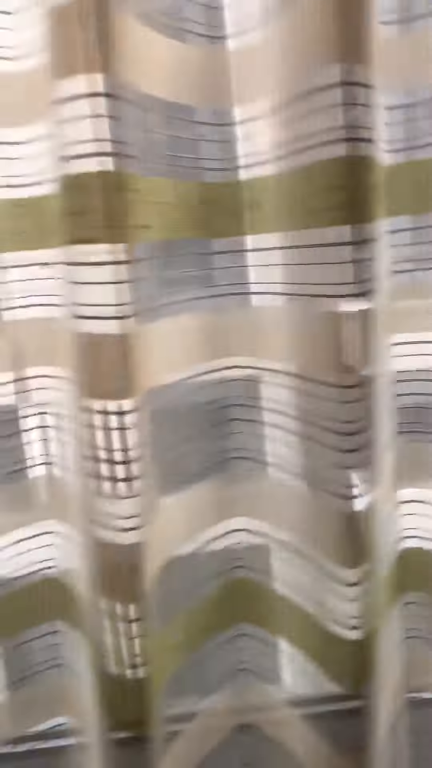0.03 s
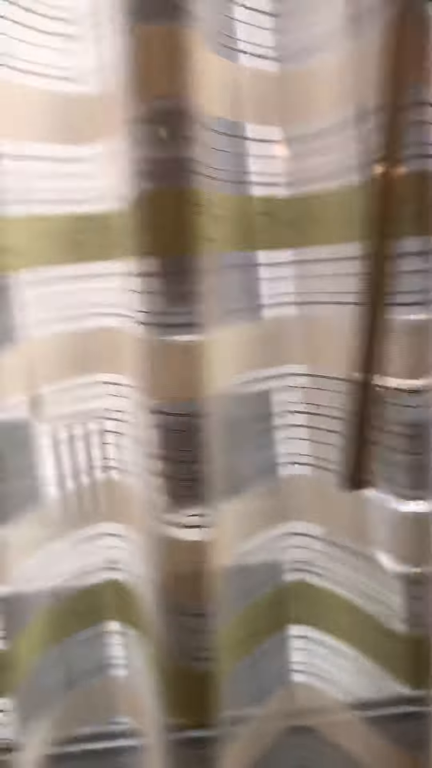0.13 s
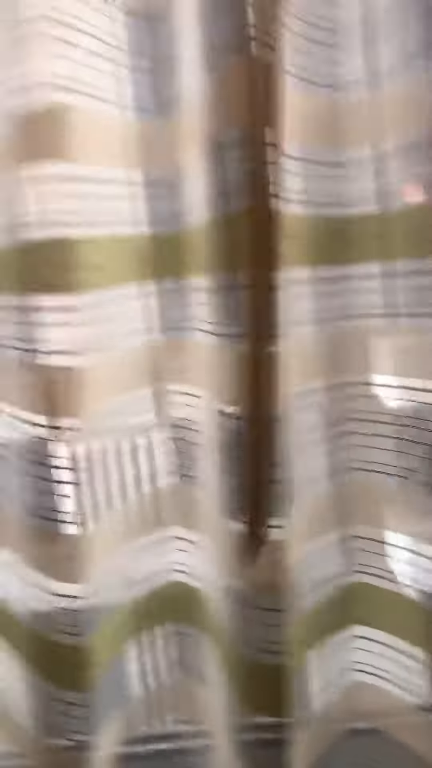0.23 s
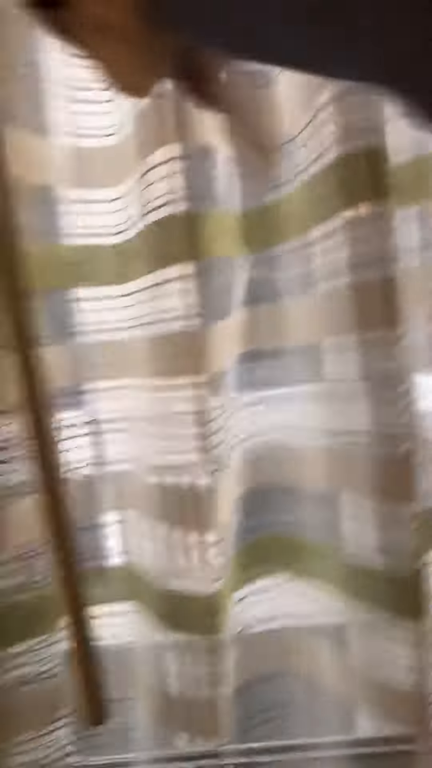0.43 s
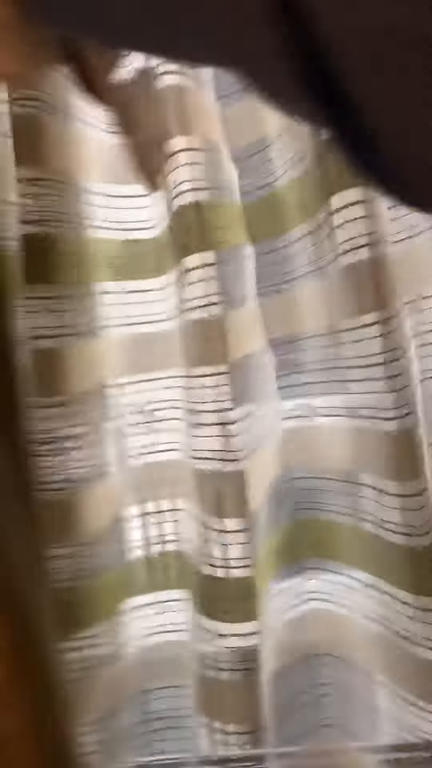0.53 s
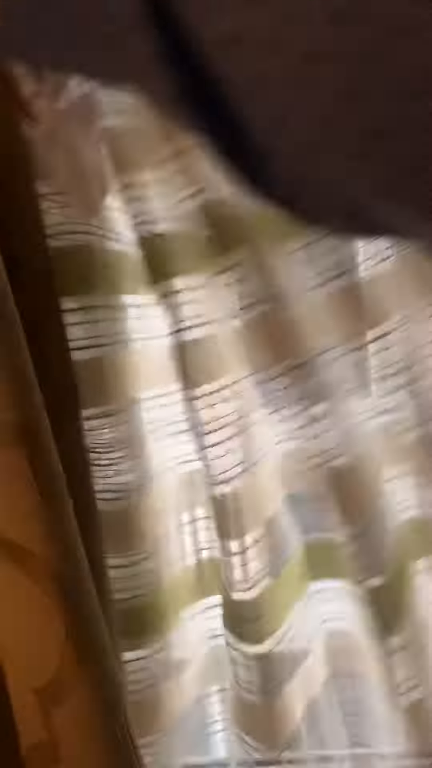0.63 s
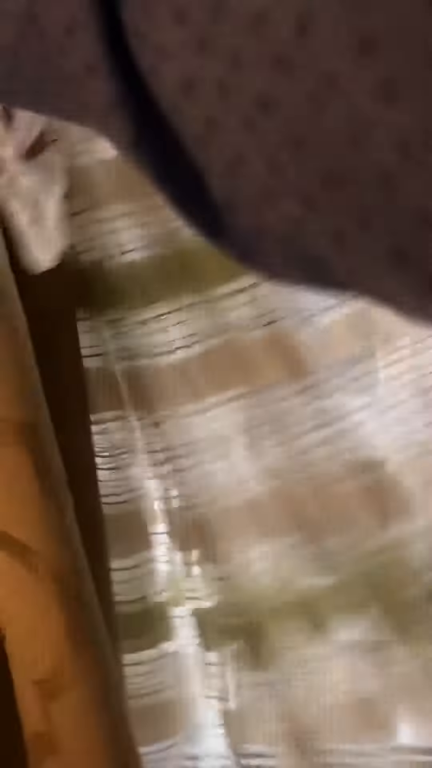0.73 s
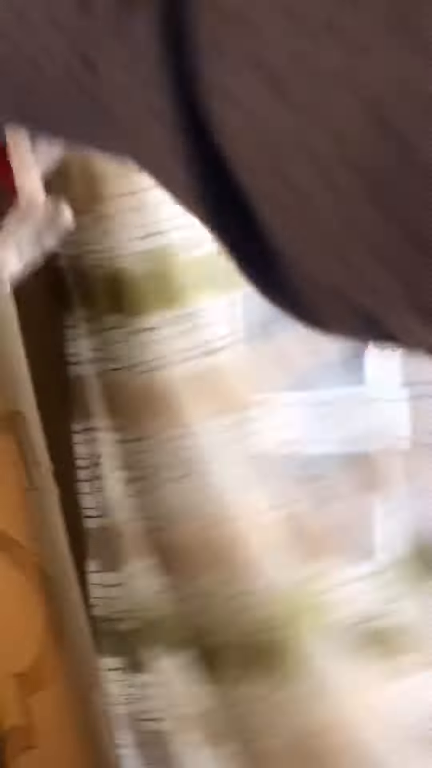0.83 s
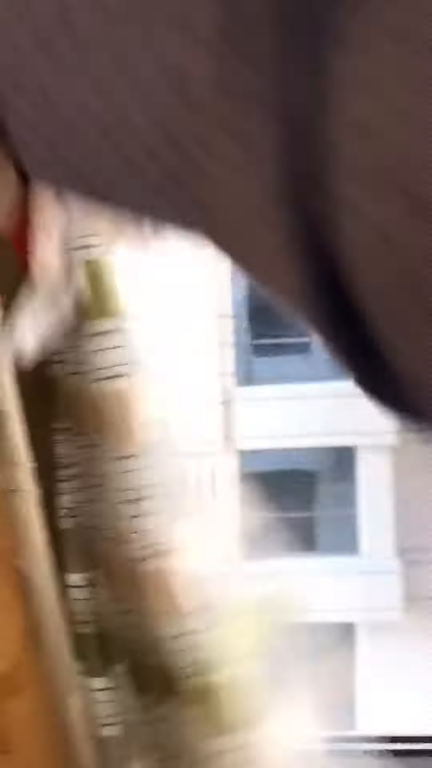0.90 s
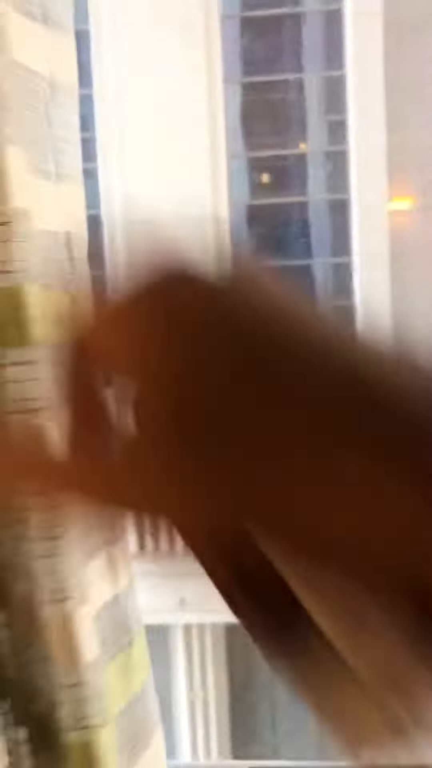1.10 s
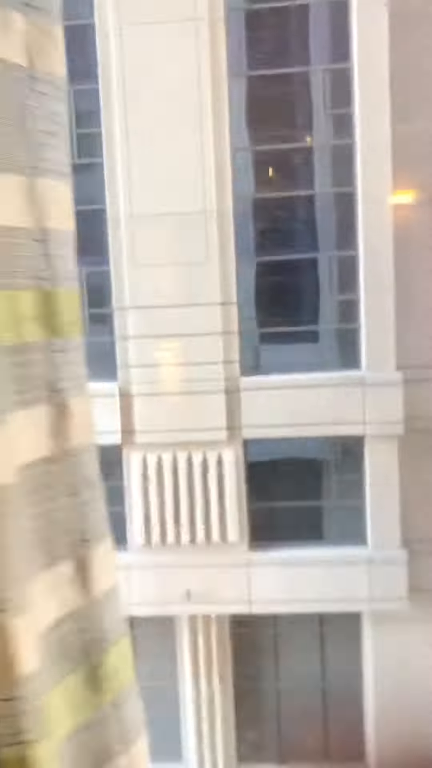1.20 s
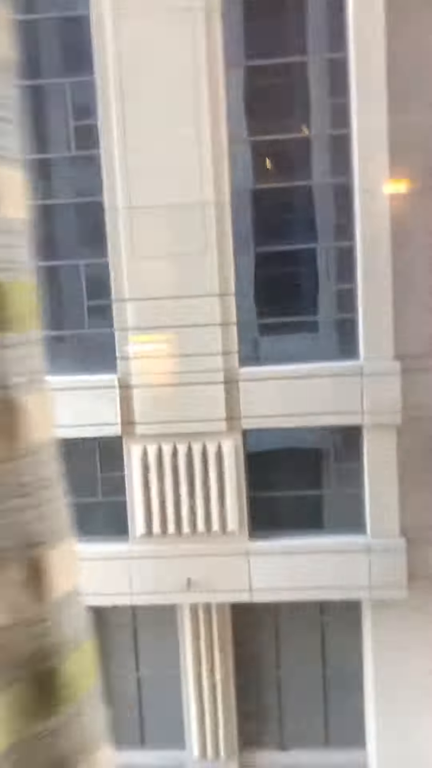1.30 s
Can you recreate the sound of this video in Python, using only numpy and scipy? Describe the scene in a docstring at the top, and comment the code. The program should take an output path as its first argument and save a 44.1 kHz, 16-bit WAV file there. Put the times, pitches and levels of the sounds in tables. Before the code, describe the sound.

A curtain is pulled aside in one stroke. From about 0.1 seconds its gliders scrape and clack along a ringing metal rail, loudest between 0.25 and 0.5 seconds, while the cloth rustles and bumps softly. A glider squeaks briefly near 0.55 seconds. From 0.7 to 1.1 seconds the hooks tick lightly and the cloth rubs and settles. A faint ventilation rumble fills the small room throughout.

```python
"""A curtain is pulled aside in one stroke in a small, quiet room, over a low ventilation rumble.
The cloth starts to rustle, and the gliders scrape along a metal rail and clack into one another,
making it ring, while the heavy folds bump softly. A glider sticks and squeaks as they slow.
Then the curtain swings back: the hooks tick, and the cloth gives a hollow rub and settles."""
import sys
import numpy as np
from scipy import signal
from scipy.fft import rfft, irfft, next_fast_len
from scipy.io import wavfile

SR = 44100
rng = np.random.default_rng(int(sys.argv[2]) if len(sys.argv) > 2 else 0)


def transcribe(u):
    """Save the signal u as a 16-bit wav file named by the first command-line argument.

    u: samples, shape (n,) or (channels, n), limited to [-1, 1]; the rate is SR.
    q: integer samples, one column per channel.
    """
    v = np.clip(np.atleast_2d(u).T, -1, 1)
    q = np.round(v * 32767).astype(np.int16)
    wavfile.write(sys.argv[1], SR, q)


N = 59535
TIME = np.arange(N) / SR


def from_db(db):
    """Decibels to gain."""
    return 10 ** (np.asarray(db) / 20)


def rms_one(x):
    """Scale to rms 1."""
    return x / np.sqrt(np.mean(x ** 2) + 1e-20)


def automation(rows):
    """Breakpoints, time first, to one sample-by-sample curve for each further column."""
    times, *columns = np.transpose(rows)
    return [np.interp(TIME, times, column) for column in columns]


def colour(x, points):
    """Minimum-phase EQ through points of f/Hz, level/dB; the output has rms 1."""
    size = 2 * next_fast_len(N)
    hz, db = np.transpose(points)
    bin_hz = np.arange(size // 2 + 1) * SR / size
    curve_db = np.interp(np.log(bin_hz + 1), np.log(hz), db)
    cepstrum = irfft(np.log(from_db(curve_db)))
    cepstrum[1:size // 2] *= 2
    cepstrum[size // 2 + 1:] = 0
    response = np.exp(rfft(cepstrum))
    return rms_one(irfft(rfft(x, size) * response)[:N])


def drift(rate_hz):
    """Smooth random modulation with rms 1."""
    r = np.exp(-2 * np.pi * rate_hz / SR)
    return rms_one(signal.lfilter([1], [1, -2 * r, r * r], rng.standard_normal(2 * N))[N:])


def resonate(x, hz, width_hz):
    """One resonance with unity gain at its peak."""
    r = np.exp(-np.pi * width_hz / SR)
    feedback = [1, -2 * r * np.cos(2 * np.pi * hz / SR), r * r]
    return signal.lfilter(np.array([1, 0, -1]) * (1 - r * r) / 2, feedback, x + 1e-18)


def narrow_band(x, hz, width_hz):
    """Two resonances in series, the second twice as wide; the output has rms 1."""
    return rms_one(resonate(resonate(x, hz, width_hz), hz, 2 * width_hz))


def grains(per_s, spread_db=3):
    """Friction as tiny random slips of uneven size."""
    sizes = from_db(spread_db * np.minimum(rng.exponential(1, N), 4))
    signs = rng.choice([-1, 1], N)
    return sizes * signs * (rng.random(N) < per_s / SR)


def burst(start, attack_s, hold_s, t60):
    """Envelope: a linear attack, then an exponential release from hold_s after the start."""
    age = TIME - start
    return np.clip(age / attack_s, 0, 1) * from_db(-60 * np.maximum(age - hold_s, 0) / t60)


def rough_tone(hz, db, wobble_hz, flutter_hz, wobble=.08, flutter_db=2.5):
    """A sine whose pitch wobbles and whose level flutters at random."""
    phase = 2 * np.pi * np.cumsum(hz * (1 + wobble * drift(wobble_hz))) / SR
    return from_db(db + flutter_db * drift(flutter_hz)) * np.sin(phase)


def ventilation():
    """Moving air lays down a steady bed of low rumble."""
    # rumble EQ: f/Hz, level/dB
    rumble_eq = [(20, -27), (32, -7), (50, -4.5), (75, 0.5), (118, -1.5), (170, -3.5), (260, -8),
                 (400, -12), (550, -19), (1000, -18), (2500, -30), (6000, -35), (16000, -40)]
    return from_db(-51) * colour(rng.standard_normal(N), rumble_eq)


def cloth():
    """Fabric brushes on fabric in fine grains, with a hollow rub on the swing back."""
    # rustle swelling and settling: t/s, level/dB
    rustle_fader = [(0, -76), (.5, -42), (.66, -53.5), (.79, -53.5), (.82, -54.5), (.86, -50), (.94, -51),
                    (1.01, -52), (1.06, -54), (1.11, -62), (1.35, -79)]
    # rustle EQ: f/Hz, level/dB
    rustle_eq = [(150, -6.5), (330, -1.5), (500, 0), (660, -4), (900, -9.5), (1800, -8), (3000, -6.5),
                 (4200, -7), (6000, -12.5), (8000, -17), (16000, -29.5)]
    # swell of the hollow rub: t/s, level/dB
    hollow_fader = [(.8, -90), (.87, -57), (.99, -57), (1.12, -90)]
    (rustle_db,), (hollow_db,) = automation(rustle_fader), automation(hollow_fader)
    slips = grains(per_s=7000)
    hollow = narrow_band(slips, hz=645, width_hz=65)
    return from_db(rustle_db) * colour(slips, rustle_eq) + from_db(hollow_db) * hollow


def scrape():
    """Gliders slip along the rail, louder with force and brighter with speed."""
    # rubbing force: t/s, level/dB
    force = [(0, -82), (.085, -58), (.122, -48.5), (.145, -40.5), (.195, -38), (.225, -36.5), (.255, -34.5),
             (.305, -28), (.335, -30), (.37, -29), (.43, -32.5), (.47, -36.5), (.52, -40.5), (.585, -36),
             (.63, -45), (.7, -61), (.8, -65), (1.35, -68.5)]
    # glider speed, heard as the fast rub's level against the slow rub: t/s, level/dB
    speed = [(.1, -5.5), (.2, -12), (.26, -0.5), (.305, 7.5), (.345, 7.5), (.385, 0), (.46, 5.5), (.53, -6),
             (.7, -6.5)]
    # slow, dull rub: f/Hz, level/dB
    slow_eq = [(120, -11), (210, -7.5), (320, -2), (600, -4.5), (1000, -2), (1700, -3.5), (2500, 1),
               (3500, 0.5), (4400, -11.5), (5500, -5), (7500, -20), (16000, -19)]
    # fast, bright rub: f/Hz, level/dB
    fast_eq = [(1500, -22.5), (3000, -9), (3850, 2.5), (4300, -3.5), (4800, 2.5), (5800, 3), (7200, -10),
               (9300, -8), (12000, -10.5), (16000, -22)]
    (force_db,), (speed_db,) = automation(force), automation(speed)
    slow, fast = (colour(grains(per_s=5500), eq) for eq in (slow_eq, fast_eq))
    bright = from_db(speed_db)
    rub = (slow + bright * fast) / np.sqrt(1 + bright ** 2)  # equal-power crossfade
    judder_db = 0.73 * drift(rate_hz=48)
    return from_db(force_db + judder_db) * rub


def rail(contacts):
    """The metal rail adds its ring to every contact."""
    # rail modes: f/Hz, level/dB, t60/s
    modes = [(1009, -4, .2), (1764, -4, .15), (2240, -10, .15), (2341, 0, .22), (2395, -5, .22),
             (2610, -4, .2), (2878, -6, .12), (3750, -5, .14), (4240, -2, .14), (4818, -9, .15),
             (4968, -7, .15), (5455, -7, .15), (5570, -8, .15), (5776, -8, .15), (6231, -3, .2)]
    ring = sum(from_db(db) * resonate(contacts, hz, np.log(1000) / (np.pi * t60))
               for hz, db, t60 in modes)
    return contacts + ring


def clacks():
    """Each knock sets off a short, dense burst of noise that holds briefly, then dies away."""
    # glider knocks: t/s, level/dB, treble/dB
    knocks = [(0.132, -38.5, -26), (.194, -51, 9.5), (.2145, -34, -1), (0.2215, -48, 12),
              (.233, -30.5, -14), (0.2627, -22.5, 0.5), (0.285, -36, 1), (0.3464, -19, 3),
              (0.3503, -33, -15), (0.386, -19.5, 4), (0.4, -22.5, -6.5), (0.4367, -24, 3.5),
              (0.4565, -31.5, -2.5), (0.49, -23.5, -1), (0.565, -29, 1), (.572, -67, 9), (0.584, -58.5, 24),
              (.736, -43, -3.5), (1.263, -60.5, 6)]
    # knock burst EQ: f/Hz, level/dB
    burst_eq = [(200, -6.5), (500, -14.5), (1000, -5.5), (1700, -7), (2250, 6), (3200, 1.5), (5500, 0),
                (6500, -0.5), (7400, -2), (8300, -3), (11000, -6.5), (12200, -11), (13100, -5),
                (14200, -5.5), (16000, -11)]
    burst_noise = colour(rng.standard_normal(N), burst_eq)
    body = signal.sosfiltfilt(signal.butter(2, 6000, fs=SR, output="sos"), burst_noise)
    treble = burst_noise - body
    out = 0
    for start, db, treble_db in knocks:
        envelope = burst(start, attack_s=0.00067, hold_s=0.0045, t60=0.053)
        out += from_db(db) * envelope * (body + from_db(treble_db) * treble)
    return out


def folds():
    """Each heavy fold pushes the air in a short, rough, low swell."""
    # soft bumps: peak t/s, level/dB, f/Hz, Gaussian width/s
    bumps = [(0.176, -42.5, 237.8, 0.018), (0.206, -34.5, 290, 0.0054), (0.231, -40.5, 250, 0.02),
             (0.254, -42.5, 106, 0.038), (0.396, -49, 100, 0.033), (.635, -47.5, 130, 0.017),
             (0.745, -52, 72, 0.017), (0.814, -45.5, 128.6, 0.0048), (0.922, -47, 101.2, 0.02),
             (1.042, -52, 127, 0.028), (1.226, -42, 79.1, 0.013)]
    out = 0
    for peak, db, hz, width_s in bumps:
        swell = np.exp(-.5 * ((TIME - peak) / width_s) ** 2)
        out += swell * rough_tone(hz, db, wobble_hz=57, flutter_hz=180)
    return out


def squeak():
    """A sticking glider sings a rough stick-slip tone that rises and falls."""
    # squeak contour: t/s, f/Hz, level/dB
    contour = [(.522, 2700, -70), (.526, 2720, -35), (.532, 2750, -42), (.541, 2880, -39),
               (.546, 3050, -31), (.552, 3130, -29), (.562, 3130, -35), (.568, 2900, -31),
               (.578, 2850, -38), (.595, 2800, -65)]
    hz, db = automation(contour)
    sticking = (TIME > contour[0][0]) & (TIME < contour[-1][0])
    return sticking * rough_tone(hz, db, wobble_hz=460, flutter_hz=200)


def hooks():
    """Hooks tick as the curtain swings back, each a brief buzz around one pitch."""
    # hook ticks: t/s, level/dB, f/Hz, t60/s
    ticks = [(.7365, -44, 5500, 0.041), (.8555, -37, 11000, 0.011), (0.855, -42.5, 6600, 0.015),
             (0.8613, -40, 5900, .12), (0.86, -40, 4060, .03), (.862, -47, 2800, 0.11),
             (0.918, -44.5, 5640, 0.11), (.955, -55, 5600, 0.098), (0.999, -55.5, 9500, 0.033),
             (1.014, -52, 3850, 0.047), (1.055, -52, 3930, 0.04)]
    out = 0
    for start, db, hz, t60 in ticks:
        buzz = narrow_band(rng.standard_normal(N), hz, width_hz=.11 * hz)
        out += from_db(db) * burst(start, attack_s=0.00046, hold_s=0.00078, t60=t60) * buzz
    return out


def room(x, wet_db=-13.5, build_s=0.0054, wall_cut_hz=16400):
    """Close walls return a short, diffuse tail with the very top rolled off."""
    tail = rng.standard_normal(N) * burst(0, attack_s=build_s, hold_s=build_s, t60=0.39)
    tail = signal.sosfilt(signal.butter(2, wall_cut_hz, fs=SR, output="sos"), tail)
    tail /= np.sqrt(np.sum(tail ** 2))
    return x + from_db(wet_db) * signal.fftconvolve(x, tail)[:N]


def scene():
    """Mono mix: the hardware with room reverb; cloth, folds and ventilation dry."""
    hardware = from_db(-2) * rail(scrape() + clacks()) + squeak() + hooks()
    rumble = ventilation()
    return (room(hardware) + cloth() + folds() + rumble)[None]


def record(dry):
    """A gentle low cut trims the deepest rumble; a steep high cut takes off the top."""
    low_cut = signal.butter(2, 49, "high", fs=SR, output="sos")
    high_cut = signal.ellip(12, .1, 80, 15720, fs=SR, output="sos")
    return signal.sosfilt(high_cut, signal.sosfilt(low_cut, dry))


dry = scene()
out = record(dry)
transcribe(out)
```